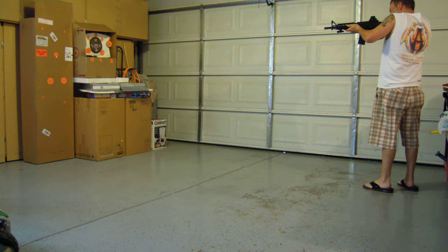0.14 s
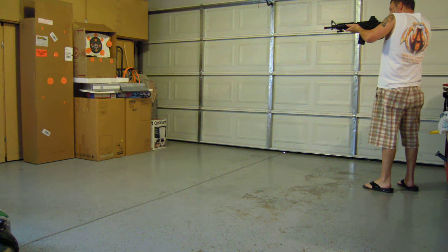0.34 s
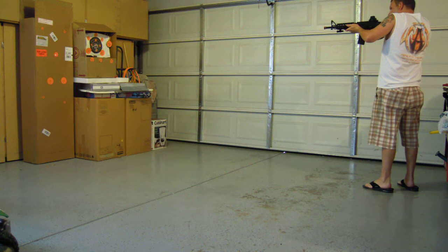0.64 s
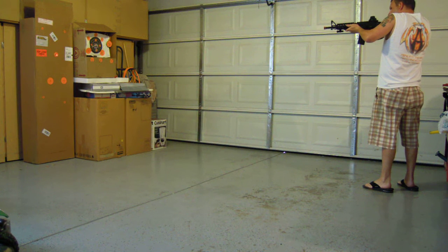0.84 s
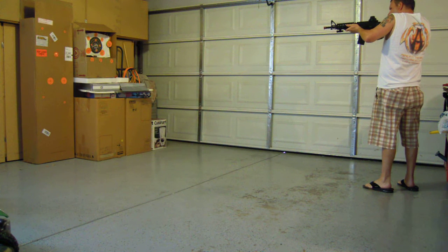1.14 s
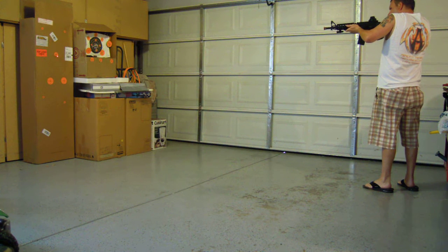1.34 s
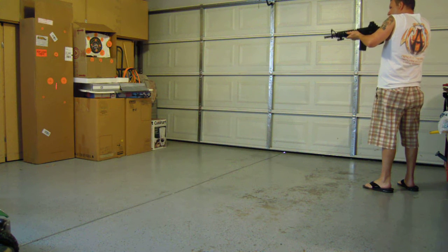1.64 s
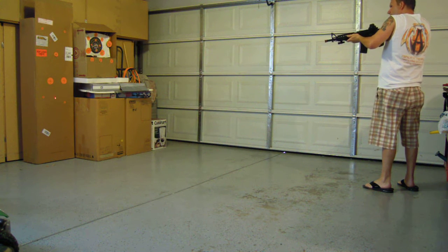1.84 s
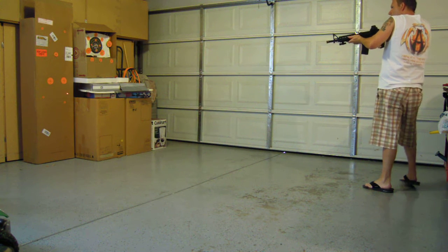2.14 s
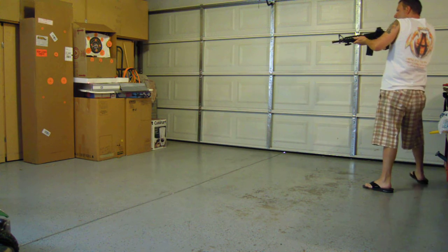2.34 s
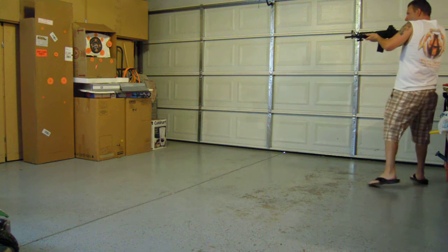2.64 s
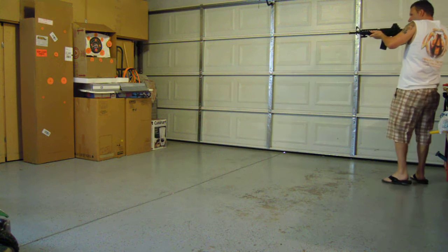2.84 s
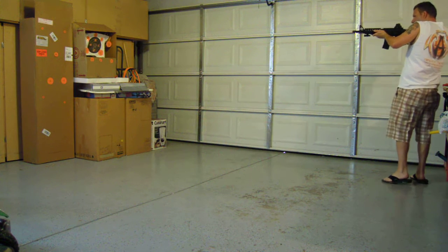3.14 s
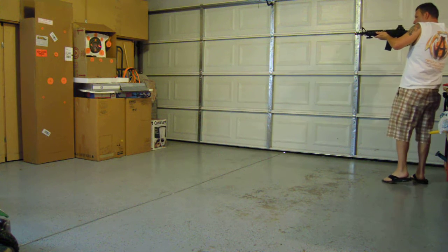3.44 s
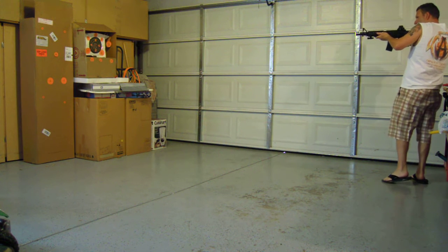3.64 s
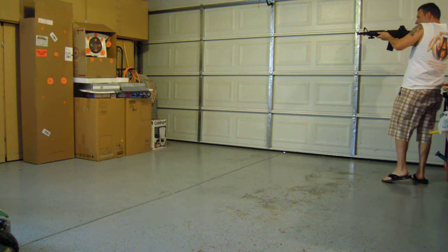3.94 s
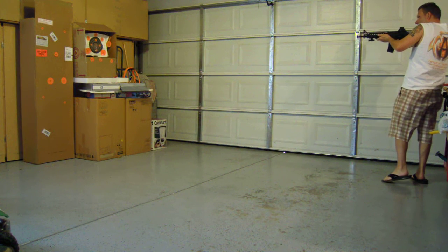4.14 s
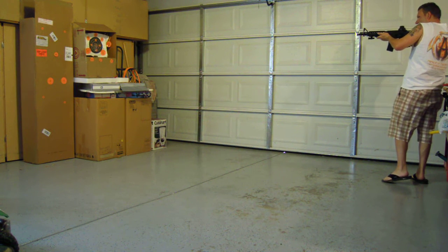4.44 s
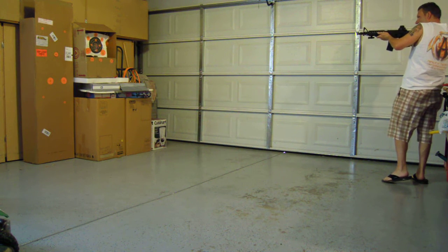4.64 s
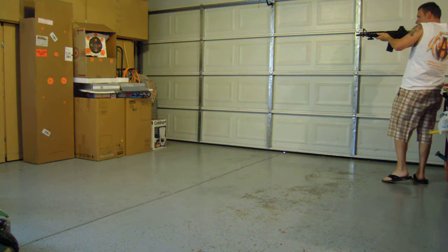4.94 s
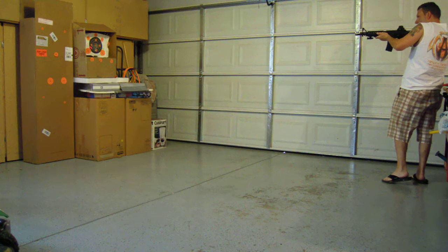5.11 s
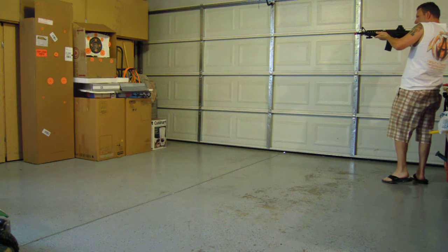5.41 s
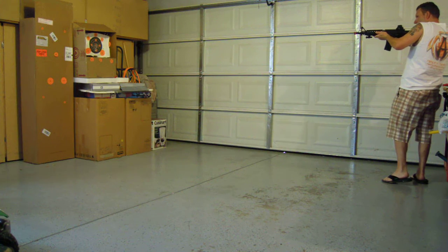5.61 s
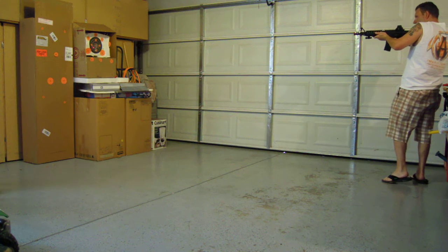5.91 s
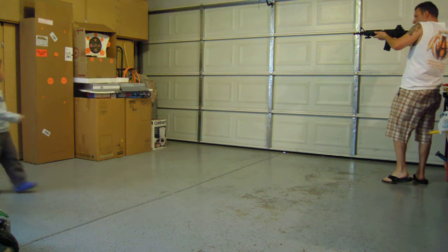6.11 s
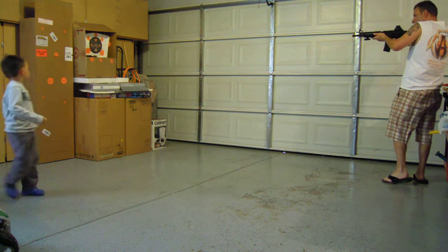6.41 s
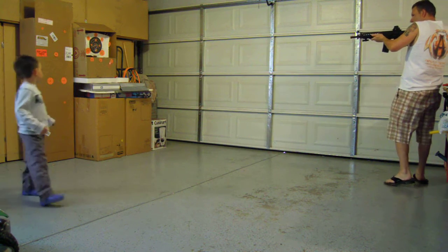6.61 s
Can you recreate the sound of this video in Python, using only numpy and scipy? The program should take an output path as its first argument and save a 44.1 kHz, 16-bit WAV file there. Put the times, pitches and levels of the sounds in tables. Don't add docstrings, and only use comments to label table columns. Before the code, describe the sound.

In a bare concrete garage, a gas valve hisses and whistles briefly, then an airsoft rifle rattles out a loud, overloaded burst with pellets thudding on cardboard. Sandals scuff and loose pellets tick on the floor. A longer spray follows, sagging in power, then four short bursts, mostly weaker. A small camera microphone a few metres away clips the strong shots, over a faint hush.

```python
import sys
import numpy as np
from scipy import signal
from scipy.fft import rfft, irfft
from scipy.io import wavfile
from scipy.ndimage import uniform_filter1d

SR = 44100
rng = np.random.default_rng(int(sys.argv[2]) if len(sys.argv) > 2 else 0)


def makeup_ratio(level_db):
    decades = np.asarray(level_db, float) / 20
    return 10 ** decades


def waveform_to_disk(signal):
    frames = np.transpose(np.atleast_2d(signal))
    scaled = np.clip(frames, -1, 1) * 32767
    samples = np.round(scaled).astype(np.int16)
    wavfile.write(sys.argv[1], SR, samples)


N = 298447

# (first shot [s], second shot [s], last shot [s])
BURSTS = [
    (0.5653, 0.6589, 1.4187),
    (2.767, 2.8687, 3.7987),
    (4.428, 4.5302, 4.784),
    (5.4118, 5.5132, 5.6855),
    (5.9306, 6.0301, 6.204),
    (6.5519, 6.6516, 6.7393),
]


def rifle():
    # (frequency [Hz], level [dB per Hz])
    crack_colour = [(50, -33), (300, -35), (1000, -28), (2800, -24.5), (4200, -6.5), (5000, -7.5),
                    (6600, -7), (7800, -1.5), (9500, -1.5), (13000, -3), (22000, -34)]
    # (frequency [Hz], level [dB per Hz])
    gas_colour = [(30, -60), (300, -15), (900, -13), (2500, -14), (4200, -9), (6500, -8.5), (8000, -1.5),
                  (9600, -4), (14000, 1), (22000, -21.5)]
    # (time [s], level [dB])
    pressure = [(0.56, 30.5), (1.15, 12.5), (1.42, 2), (2.76, 9), (2.9, 15.5), (3.25, 2.5), (3.5, -3),
                (3.8, -7), (4.42, 14.5), (4.6, 6), (4.79, 0), (5.41, -2), (5.69, -7.5), (5.93, -9.5),
                (6.12, -10), (6.21, -5.5), (6.55, -8), (6.74, -9.5)]
    first_gas_db = [8, 12.5, 2, 0, -0.5, -17]
    # (time [s], level [dB])
    seep = [(0, -22.5), (.2, -33.5), (.46, -22.5), (.6, -37), (1.4, -70)]
    scatter_db, last_gas_db = 1.5, -4.5
    gas_full_db, gas_knee_db, gas_slope = 1.5, 3, 1.31
    valve_open_s, valve_shut_s, leak_low_hz = 0.045, 0.0051, 750

    t = np.arange(SR // 4) / SR
    crack = colour(1. * (t == 0), crack_colour)
    crack /= np.abs(crack).max()
    crack += makeup_ratio(-35) * np.sin(2 * np.pi * 910 * t) * np.exp(-t / .004)
    closing = np.maximum(t - valve_open_s, 0) / valve_shut_s
    blast = (1 - np.exp(-t / 0.0014)) * np.exp(-t / 0.084 - closing)

    cracks, flow = np.zeros(N), np.zeros(N)
    for burst, dump_db in zip(BURSTS, first_gas_db):
        times, place = shots(burst)
        crack_db = np.interp(times, *np.transpose(pressure)) + scatter_db * rng.standard_normal(len(times))
        gas_db = gas_full_db + gas_slope * np.minimum(crack_db - gas_knee_db, 0)
        gas_db += dump_db * (place == 0) + last_gas_db * (place == 1)
        for s, db, puff_db in zip(times, crack_db, gas_db):
            add(cracks, s, makeup_ratio(db + 3) * crack)
            add(flow, s, makeup_ratio(puff_db - 19.5) * blast)

    hiss, whistle = leaks()
    flow += curve(seep, column=1) * makeup_ratio(-26.5)
    jet = unit(colour(rng.standard_normal(N), gas_colour))
    thin = signal.sosfilt(signal.butter(4, leak_low_hz, "high", fs=SR, output="sos"), jet)
    return cracks, flow * jet + hiss * makeup_ratio(-1) * thin + whistle * makeup_ratio(-11.5)


def shots(burst):
    cycle_s = .085
    first, second, last = burst
    count = round((last - second) / cycle_s) + 1
    times = np.r_[first, np.linspace(second, last, count)]
    return times, np.linspace(0, 1, len(times))


def leaks():
    # (squeeze [s], opening [s], hiss when open [dB], hiss at the shot [dB])
    squeezes = [
        (0.463, 0.035, -17, -17.5),
        (2.693, 0.018, -35, -20),
        (4.35, 0.027, -35, -27),
        (5.37, .03, -49, -21),
        (5.905, 0.018, -39, -61),
        (6.53, 0.015, -38, -37),
    ]
    # (start [s], loudest [s], end [s], level [dB], starting frequency [Hz])
    whistles = [
        (0.474, .498, .56, -19, 900),
        (2.732, 2.747, 2.76, -25, 850),
        (4.352, 4.405, 4.425, -37, 520),
    ]
    shut_db, edge_db = -32, -13
    whistle_hz, width_hz = 920, 100

    hiss = []
    for (s, opening_s, open_db, shot_db), (shot_s, _, _) in zip(squeezes, BURSTS):
        open_s = min(s + opening_s, shot_s - .002)
        hiss.append([(s, open_db + shut_db), (open_s, open_db), (shot_s, shot_db)])
    tone = []
    for s, top_s, end_s, db, hz in whistles:
        tone.append([(s, db + edge_db, hz), (top_s, db, whistle_hz), (end_s, db + edge_db, whistle_hz)])

    rows = np.concatenate(tone)
    glide_hz = np.interp(np.arange(N) / SR, rows[:, 0], rows[:, 2])
    phase = 2 * np.pi * np.cumsum(glide_hz) / SR
    slow = signal.lfilter(*signal.butter(2, width_hz / 2, fs=SR), rng.standard_normal((2, N)))
    whistle = unit((1 + unit(slow[0])) * np.cos(phase) + unit(slow[1]) * np.sin(phase))
    return sum(curve(r, column=1) for r in hiss), whistle * sum(curve(r, column=1) for r in tone)


def target():
    # (burst, flight [s], first thud [dB], last thud [dB], body [Hz], snap [dB])
    on_card = [
        (0, .039, 9.5, -9.5, 1134, -27),
        (0, .06, 3.5, -18, 667, -20.5),
    ]
    # (burst, flight [s], first thud [dB], last thud [dB], body [Hz], snap [dB])
    on_panel = [
        (2, .037, 4, -14.5, 2180, -17),
        (3, 0.051, -15.5, -19.5, 2170, -10.5),
    ]
    # (time [s], thud [dB], body [Hz], snap [dB])
    card_strays = [
        (1.454, -23, 589, 2),
        (2.899, -4, 850, 6),
        (3.157, -12.5, 610, 4.5),
        (3.325, -19.5, 910, -22),
        (3.409, -23.5, 715, -25),
    ]
    # (time [s], thud [dB], body [Hz], snap [dB])
    panel_strays = [
        (2.809, 3, 2340, -9),
        (2.999, -15, 1800, -16),
        (3.064, -9.5, 1980, -4),
        (3.663, -15.5, 2150, -5.5),
        (3.75, -26, 2010, -24),
        (3.833, -26, 2000, -18),
        (6.152, -27, 1460, -14),
        (6.584, -15, 1900, -4),
        (6.684, -13.5, 1950, -4),
    ]
    card = knocks([*pellets(on_card), *card_strays], -4.1, -5, width=1.0)
    panel = knocks([*pellets(on_panel), *panel_strays], -11.5, -5, width=1.0)
    return card + panel


def pellets(aims):
    thud_scatter_db, snap_scatter_db, body_spread = 1.2, 2.5, .08
    rows = []
    for burst, flight_s, first_db, last_db, hz, snap_db in aims:
        times, place = shots(BURSTS[round(burst)])
        chance = rng.standard_normal((len(times), 3))
        for s, u, (a, b, c) in zip(times, place, chance):
            thud_db = first_db + (last_db - first_db) * u + thud_scatter_db * a
            rows.append((s + flight_s, thud_db, hz * (1 + body_spread * b), snap_db + snap_scatter_db * c))
    return rows


def knocks(rows, box_db, gain_db, width):
    blow, out = 1. * (np.arange(SR // 20) == 0), np.zeros(N)
    snap = ring(ring(blow, 9840, 16300), 9660, 8900)
    snap /= np.abs(snap).max()
    box = makeup_ratio(box_db) * ring(blow, 453, 460)
    for s, db, hz, snap_db in rows:
        thud = ring(blow, hz, width * hz) + box
        thud /= np.abs(thud).max()
        add(out, s + .001, makeup_ratio(gain_db) * (makeup_ratio(db) * thud + makeup_ratio(snap_db) * snap))
    return out


def floor_taps():
    # (time [s], thud [dB], body [Hz], snap [dB])
    taps = [(0.11, -36, 840, -59), (0.228, -37.5, 500, -27.5), (1.764, -32.5, 960, -54),
            (1.876, -32, 1330, -40), (1.974, -23, 2200, -32), (2.088, -34, 2100, -39),
            (2.159, -27, 1280, -29), (2.253, -25, 1020, -35), (2.324, -28, 910, -34),
            (2.422, -17, 1790, -18.5), (2.516, -27, 1260, -46), (2.566, -36, 1100, -38),
            (2.613, -19, 1280, -38), (2.644, -52, 762, -20), (4.274, -38, 593, -39),
            (4.341, -30, 1940, -45), (5.081, -22.5, 2337, -6.5), (5.205, -34.5, 1470, -50),
            (5.265, -47, 708, -22), (5.378, -59, 810, -30), (6.372, -45, 900, -34), (6.405, -60, 900, -24),
            (6.526, -35.5, 1200, -61)]
    return knocks(taps, -21.0, -7.5, width=1.5)


def scuff():
    # (time [s], level [dB])
    scuff_level = [
        (1.72, -42.5),
        (1.95, -38.5),
        (2.0, -33),
        (2.14, -35.5),
        (2.3, -32.5),
        (2.4, -33.5),
        (2.53, -29),
        (2.65, -29.5),
        (2.74, -28.5),
    ]
    # (frequency [Hz], level [dB per Hz])
    rub_colour = [(30, -15), (100, -25.5), (330, -12), (830, -4), (1300, -3.5), (2500, -12), (3600, -22),
                  (6400, -13), (10000, -22), (22000, -42)]
    patch_s, patch_db = .025, 1.8
    grain_gain = makeup_ratio(2.1 * np.minimum(rng.exponential(size=N), 4))
    grains = rng.standard_normal(N) * grain_gain * (rng.random(N) < .03)
    k = int(patch_s * SR)
    patches = unit(uniform_filter1d(uniform_filter1d(rng.standard_normal(N), k), k))
    rub = unit(colour(grains * makeup_ratio(patch_db * patches), rub_colour))
    return rub * curve(scuff_level, column=1) * makeup_ratio(-18)


def room_tone():
    # (frequency [Hz], level [dB per Hz])
    hush_colour = [(18, -51), (30, -2.5), (275, -6.5), (552, -2.5), (1730, -6.5), (2650, -5.5),
                   (3000, -8.5), (7920, -10.5), (10200, -18), (11500, -48), (15000, -72), (22000, -120)]
    # (time [s], level [dB])
    hush_level = [(0, -43.5), (.45, -43), (1.7, -48), (4.2, -49.5), (5.3, -51), (6.8, -52.5)]
    hush = unit(colour(rng.standard_normal(N), hush_colour)) * curve(hush_level, column=1)
    return hush + makeup_ratio(-55.5) * rng.standard_normal(N)


def garage(echoes, tail_db, build_s):
    # (band centre [Hz], T60 [s])
    decay = [(125, 0.8), (250, 0.55), (500, 0.66), (1000, 0.58), (2000, 0.58), (4000, 0.57), (8000, 0.39),
             (16000, 0.37)]
    t = np.arange(SR) / SR
    octave = np.log2(np.arange(SR // 2 + 1) + 1)
    noise, out = rfft(rng.standard_normal(SR)), np.zeros(SR)
    for centre_hz, t60_s in decay:
        share = np.sqrt(np.clip(1 - np.abs(octave - np.log2(centre_hz)), 0, 1))
        out += irfft(noise * share) * makeup_ratio(-60 * t / t60_s)
    out *= makeup_ratio(tail_db) * (1 - np.exp(-t / build_s))
    for ms, db, smear_ms in echoes:
        spray = rng.standard_normal(SR // 20)
        spray[0] = np.sign(spray[0])
        add(out, ms / 1000, makeup_ratio(db) * spray * np.exp(-t[:SR // 20] * 1000 / smear_ms))
    return out


def heard(x, places, drift_s):
    count, out = len(places), 0
    at = np.arange(N) / SR / drift_s % count
    for k, echo in enumerate(places):
        away = np.abs((at - k + count / 2) % count - count / 2)
        out = out + signal.oaconvolve(x * np.sqrt(np.clip(1 - away, 0, 1)), echo)[:N]
    return out


def colour(x, table):
    hz, db = np.transpose(table)
    bins_hz = np.arange(1025) * SR / 2048
    log_gain = np.interp(np.log(bins_hz + 1), np.log(hz), db) * np.log(10) / 20
    cepstrum = irfft(log_gain)
    cepstrum[1:1024] *= 2
    cepstrum[1025:] = 0
    return signal.fftconvolve(x, irfft(np.exp(rfft(cepstrum))))[:len(x)]


def unit(x):
    return x / np.sqrt(np.mean(x ** 2))


def ring(x, hz, width_hz):
    return signal.lfilter(*signal.iirpeak(hz, hz / width_hz, SR), x)


def curve(rows, column):
    rows = np.array(rows)
    return makeup_ratio(np.interp(np.arange(N) / SR, rows[:, 0], rows[:, column], -120, -120))


def add(out, s, x):
    k = min(int(s * SR), N)
    out[k:k + len(x)] += x[:len(out) - k]


def scene():
    # (delay [ms], level [dB], smear [ms])
    reflections = [
        (0, -1, .15),
        (1.8, -3, 1),
        (7, -10, 1),
        (12, -8, 1.5),
        (18.5, -11, 3),
        (22.5, -12, 1.5),
        (29, -15, 3),
        (33, -11, .8),
        (38, -13, 1),
    ]
    sway_s, swirl_s = .25, .025
    cracks, gas = rifle()
    muzzle = [garage(reflections, tail_db=-19, build_s=0.015) for _ in range(5)]
    rattle = [(0, -2.5, 10.0), (14, -2.5, 8.3)]
    shelves = [garage(rattle, tail_db=-13.0, build_s=0.0022) for _ in range(4)]
    near = heard(cracks, muzzle, sway_s) + heard(gas + scuff(), muzzle, swirl_s)
    far = heard(target() + floor_taps(), shelves, sway_s / 2)
    return (near + far + room_tone())[None]


def top_cut(x):
    return signal.sosfilt(signal.butter(12, 12250, fs=SR, output="sos"), x)


def record(dry):
    # (frequency [Hz], gain [dB])
    converter = [(20, -1), (9300, -1), (10300, -6.5), (11000, -17.5), (11600, -17.5), (12300, -27.5),
                 (22000, -68)]
    mic_top_hz, ceiling = 10600, .49
    capsule = signal.sosfilt(signal.butter(4, mic_top_hz, fs=SR, output="sos"), dry)
    clipped = capsule / (1 + np.abs(capsule / ceiling) ** 16) ** (1 / 16)
    hz, db = np.transpose(converter)
    gain = makeup_ratio(np.interp(np.arange(N // 2 + 1) * SR / N, hz, db))
    return top_cut(irfft(rfft(clipped) * gain, N))


dry = scene()
out = record(dry)
waveform_to_disk(out)
```